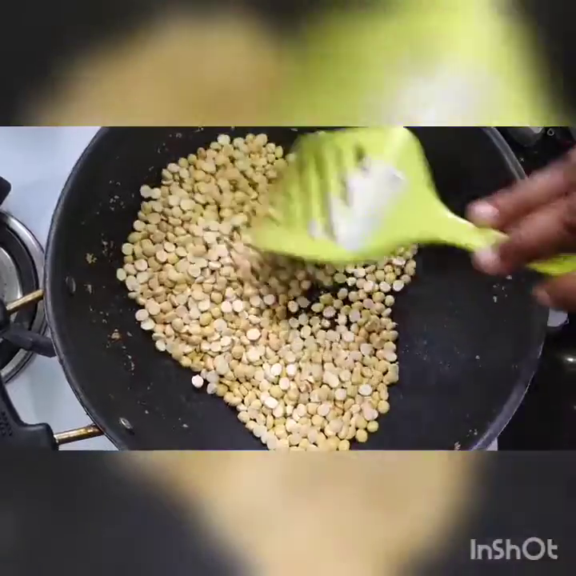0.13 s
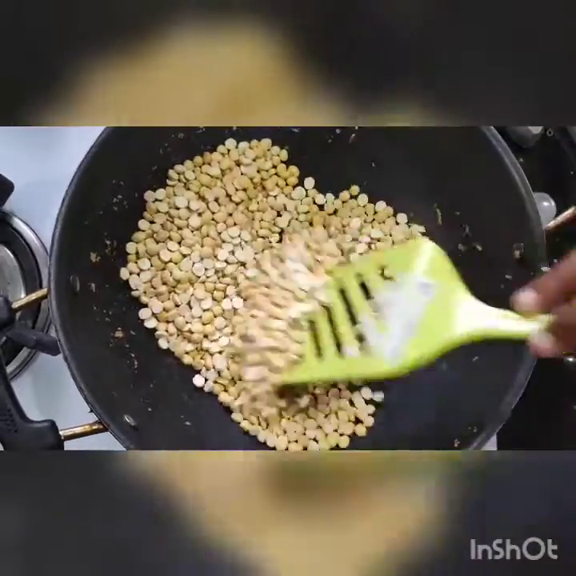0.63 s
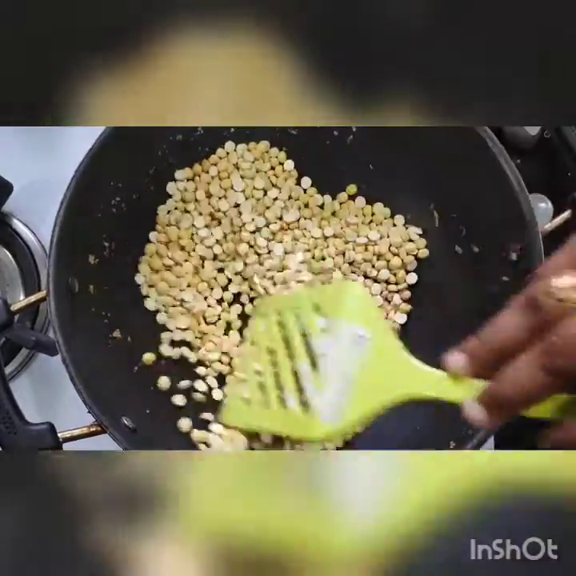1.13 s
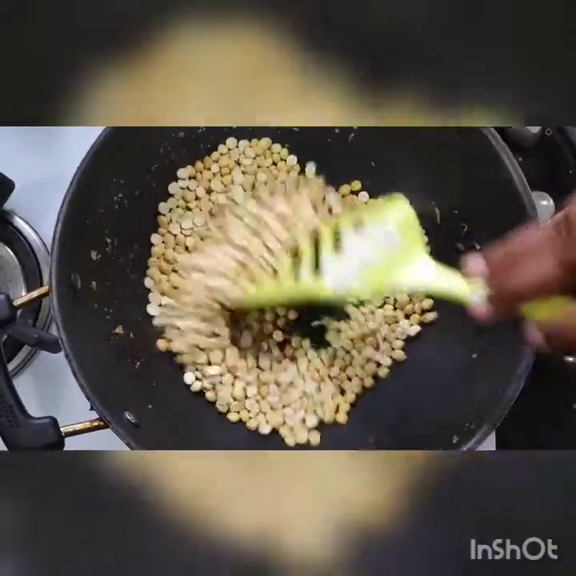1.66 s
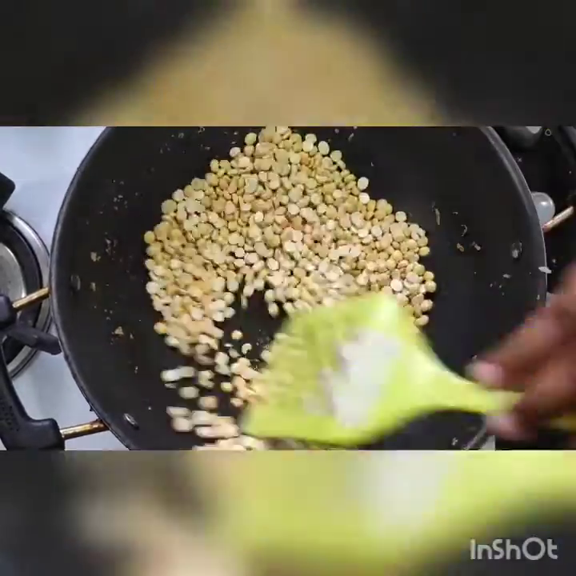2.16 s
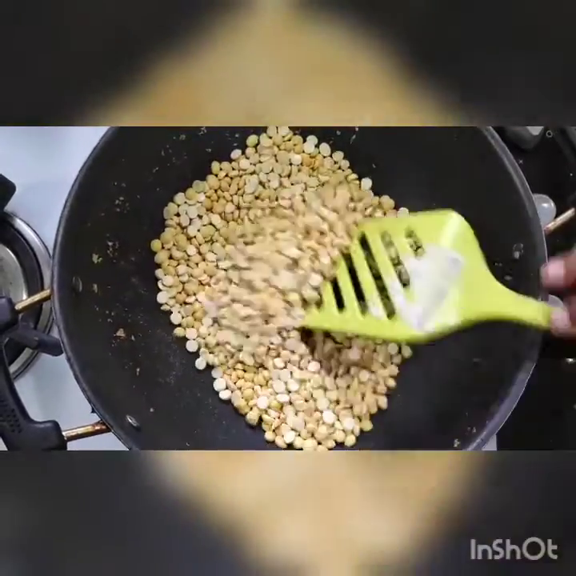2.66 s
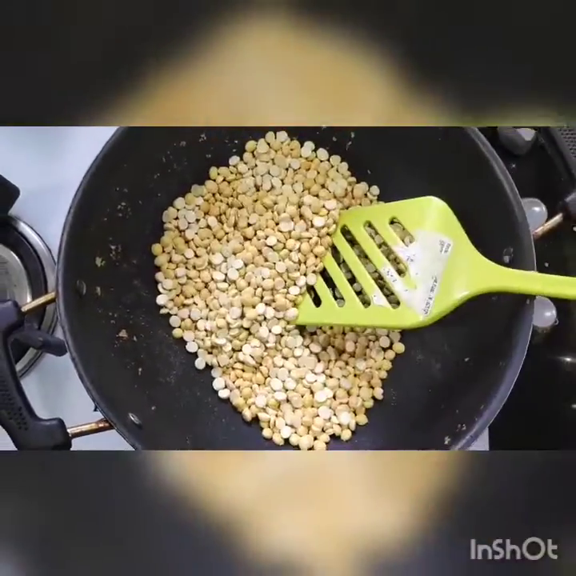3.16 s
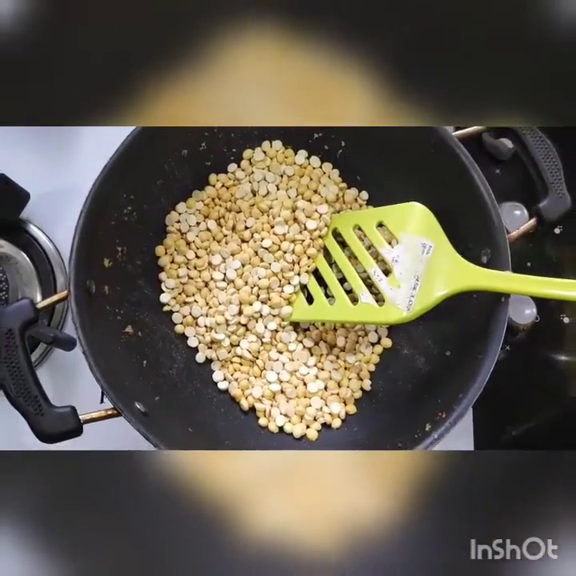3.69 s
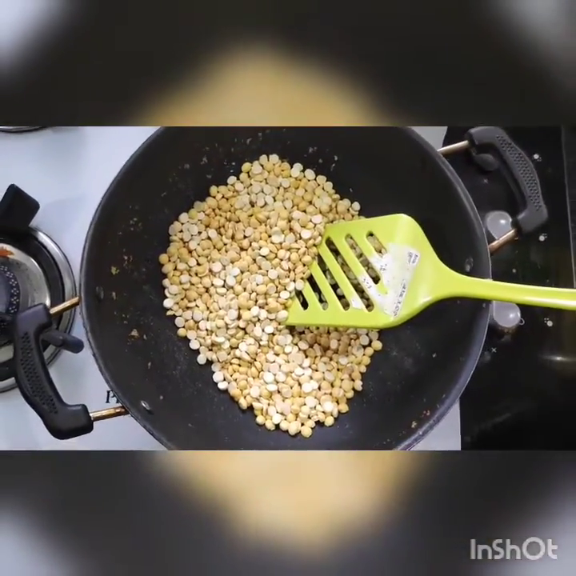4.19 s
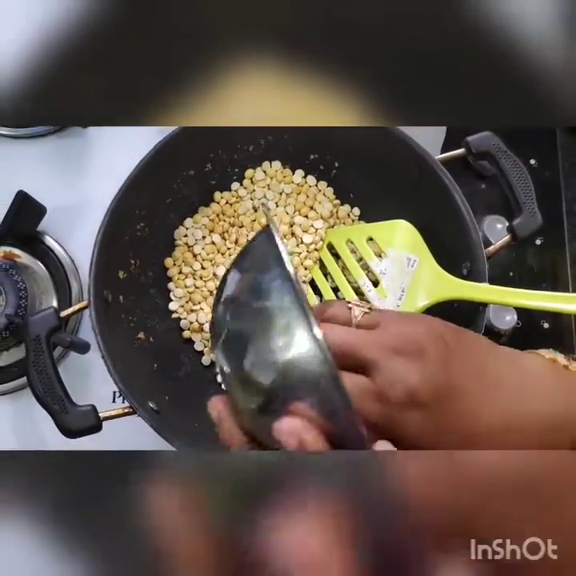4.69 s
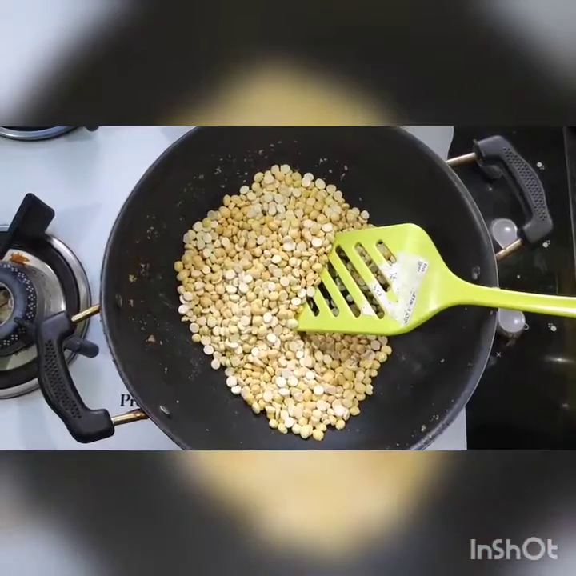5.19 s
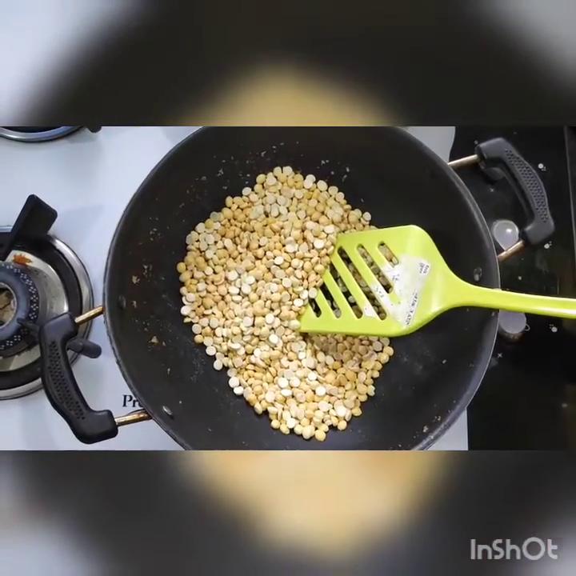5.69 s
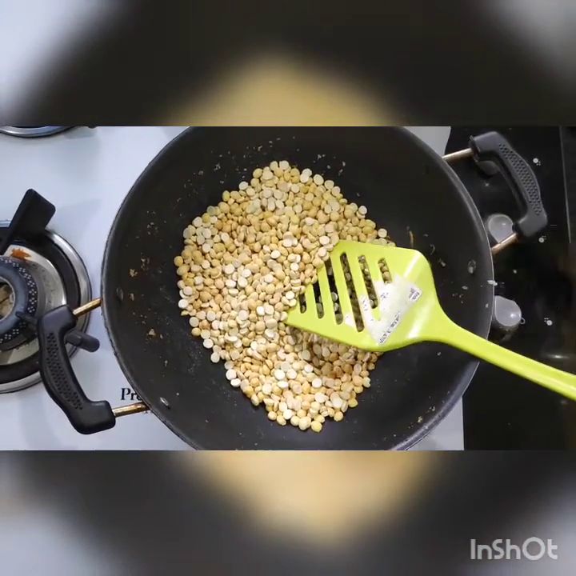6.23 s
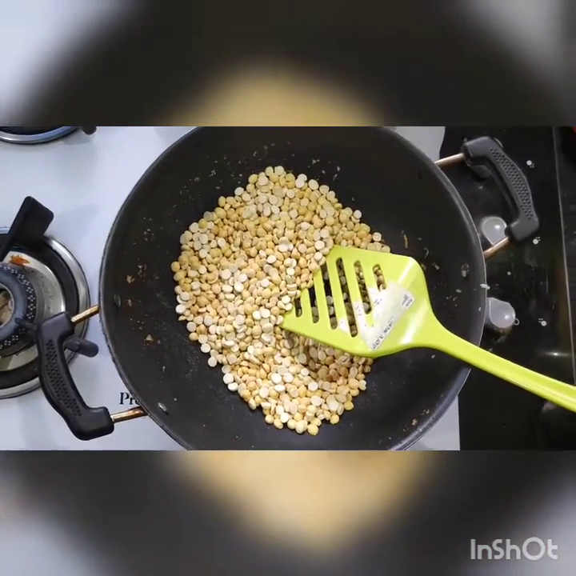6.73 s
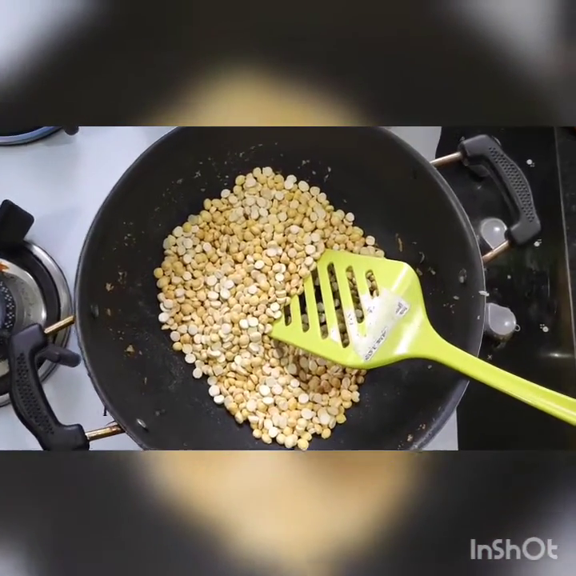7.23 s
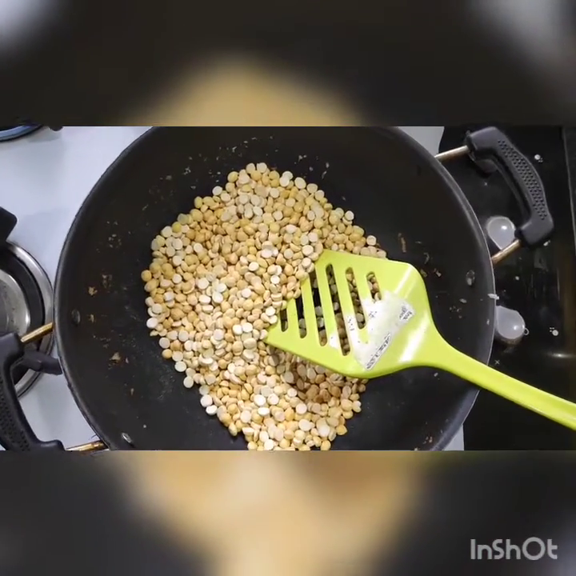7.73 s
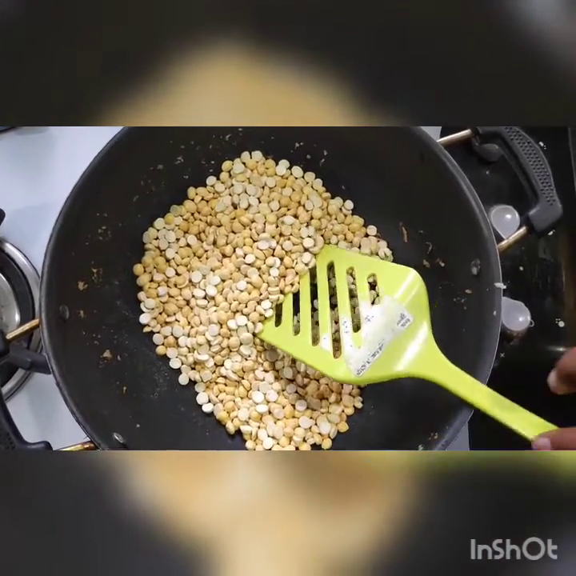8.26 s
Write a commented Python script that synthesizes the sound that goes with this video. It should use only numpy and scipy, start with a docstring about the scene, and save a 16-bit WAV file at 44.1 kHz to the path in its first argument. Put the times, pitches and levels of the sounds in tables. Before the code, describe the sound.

Bright rattling strokes through dry peas in a pan end with a hard knock; soft rustling follows, then steelware clanks and scrapes over a low fan drone.

```python
"""Stirring dry peas in a kitchen

A plastic spatula stirs dry split peas in a metal pan: clumped random contacts drive treble ticks and pan modes.
Hands and cloth then rustle on metal, and steelware knocks and drags on the counter as a struck steel bowl rings.
The pan jolts on its grate and metal squeaks; a fan motor drones as wavering noisy orders under the room tone.
Two microphone ports hear it, the right one through a bright cavity resonance; a noise tail is the small room.
"""
import sys
import numpy as np
from scipy import signal
from scipy.fft import rfft, irfft, next_fast_len
from scipy.io import wavfile

SR = 44100
rng = np.random.default_rng(int(sys.argv[2]) if len(sys.argv) > 2 else 0)


def invert_db(x):
    """Field ratio 10**(x/20) for x, a level in decibels (scalar or array-like)."""
    u = np.asarray(x, float) / 20
    return 10 ** u


def transcribe(u):
    """Save the signal u as a 16-bit wav file named by the first command-line argument.

    u: samples, shape (n,) or (channels, n), limited to [-1, 1]; the rate is SR.
    q: integer samples, one column per channel.
    """
    v = np.clip(np.atleast_2d(u).T, -1, 1)
    q = np.round(v * 32767).astype(np.int16)
    wavfile.write(sys.argv[1], SR, q)


N = 369116


def rms_one(x):
    """Scale so that the mean of the channels has rms 1."""
    return x / np.sqrt(np.mean(np.mean(np.atleast_2d(x), axis=0) ** 2) + 1e-20)


def cut(x, hz, kind):
    """Butterworth filter of order 2."""
    return signal.sosfilt(signal.butter(2, hz, kind, fs=SR, output="sos"), x)


def colour(x, spectrum):
    """Smooth spectral shaping, interpolated over log frequency."""
    size = next_fast_len(N + 4096)
    hz = np.maximum(np.arange(size // 2 + 1) * SR / size, 1)
    table = np.array(spectrum)
    gain_db = np.interp(np.log(hz), np.log(table[:, 0]), table[:, 1])
    return irfft(rfft(x, size) * invert_db(gain_db), size)[..., :N]


def resonance(x, hz, width_hz):
    """Two-pole band-pass, gain 1 on top."""
    r = np.exp(-np.pi * width_hz / SR)
    poles = [1, -2 * r * np.cos(2 * np.pi * hz / SR), r * r]
    return signal.lfilter([(1 - r * r) / 2, 0, (r * r - 1) / 2], poles, x)


def drift(rate_hz):
    """Slow random curve of rms 1: noise at every 40th sample through two equal poles at rate_hz."""
    r = np.exp(-80 * np.pi * rate_hz / SR)
    slow = signal.lfilter([1], [1, -2 * r, r * r], rng.standard_normal(N // 40 + 2002))[2000:]
    return np.interp(np.arange(N) / 40, np.arange(len(slow)), rms_one(slow))


# resonances of the left and the right microphone port, the right with its cavity; f/Hz, width/Hz, boost/dB
LEFT_PORT = [(3354, 420, 4), (2020, 3000, 4), (4010, 57, 1.5)]
RIGHT_PORT = [(7290, 1800, 11), (5020, 530, 5), (6290, 81, 11.5), (7370, 720, 5.5), (13100, 9700, -7),
              (4560, 210, 5.5)]


def ports(pair):
    """Each microphone port adds its own broad and narrow resonances."""
    out = []
    for x, peaks in zip(pair, (LEFT_PORT, RIGHT_PORT)):
        for hz, width_hz, boost_db in peaks:
            x = x + (invert_db(boost_db) - 1) * resonance(x, hz, width_hz)
        out.append(x)
    return np.array(out)


# how far the left port lags for each of six contact spots; lag/samples
LAGS = [-7, -2, 3, 6, 9, 13]


def grains(per_s, spread_db, clump_db, side):
    """Random contacts in clumps, at spots that reach the ports with different lags; side flips the lead."""
    sizes = invert_db(spread_db * np.minimum(rng.exponential(1, N), 4)) * rng.choice([-1, 1], N)
    clicks = sizes * (rng.random(N) < per_s * invert_db(clump_db * drift(25.0)) / SR) + 1e-18
    spot = rng.integers(0, len(LAGS), N)
    left = sum(np.roll(clicks * (spot == k), side * lag) for k, lag in enumerate(LAGS))
    return ports([left, clicks])


def bursts(events, db, decay_s, rise_s=2e-5):
    """Envelope that rises quickly at each blow and dies away exponentially."""
    clicks = np.full(N, 1e-18)
    clicks[(np.array(events)[:, 0] * SR).astype(int)] = invert_db(db)
    dying = signal.lfilter([1], [1, -np.exp(-1 / (decay_s * SR))], clicks)
    rise = np.exp(-1 / (rise_s * SR))
    return signal.lfilter([1 - rise], [1, -rise], dying)


def moves(rows, lingers=1, follows=0):
    """Level in dB of separate moves, each a straight rise and fall; follows adds a share of the last column."""
    t = np.arange(N) / SR
    swell_db = 20  # risen within the swell time, lost again within the fade time
    levels = []
    for s, swell, fade, db, re_db in rows:
        distance = np.where(t < s, (s - t) / swell, (t - s) / (fade * lingers))
        levels.append(db + follows * re_db - swell_db * distance)
    return np.max(levels, axis=0)


def body(x, modes, wander_db):
    """Modes in parallel; their strengths wander, quickly and slowly, as the contact moves."""
    out = 0
    for k, (hz, width_hz, db) in enumerate(modes):
        strength = invert_db(db + wander_db * drift(54.0) + 3.5 * drift(8))
        out = out + (-1) ** k * strength * resonance(x, hz, width_hz)
    return rms_one(out)


# fan motor orders, the lowest one levelled by DRONE_SWELL instead; f/Hz, width/Hz of each of two passes, level/dB
DRONE = [(43, 12, -46), (93.6, 6.9, -51), (128.8, 24.6, -52.5), (165.9, 19.6, -52.5), (244.6, 63, -59)]
# swell of the lowest motor order, before a trim; t/s, level/dB
DRONE_SWELL = [(0.0, -46.5), (1.35, -54), (1.84, -42), (2.07, -50), (2.45, -41), (2.89, -48.5), (3.12, -40),
               (4.41, -38.5), (7.69, -56), (7.85, -47), (8.37, -52)]
# spectrum of the room tone; f/Hz, relative level/dB
AIR = [(35, -30), (60, 0.5), (170, -13), (250, -14), (450, -12), (900, -14.5), (1700, -16), (3500, -27.5),
       (6500, -36.5), (9000, -34), (13800, -34.5), (14800, -78)]


def background():
    """Narrow noisy motor orders, the lowest with a steadier core, over a diffuse room tone."""
    mid, side = rng.standard_normal((2, N))
    bass = cut(mid + .25 * side * [[1], [-1]], 900, "low")  # nearly alike on both sides
    treble = cut(np.array([mid, side]), 900, "high")  # independent sides
    air = ports(colour(bass + treble, AIR)) * invert_db([[-1.0], [1.0]])
    air_db = -55  # level above 300 Hz
    air *= invert_db(air_db + .6 * drift(3)) / np.std(cut(air.mean(axis=0), 300, "high"))
    orders = []
    for hz, width_hz, db in DRONE:
        noise = rng.standard_normal(N)
        narrow = resonance(resonance(noise, hz, width_hz), hz, width_hz)
        orders.append(rms_one(narrow) * invert_db(db))
    core_hz = DRONE[0][0] * (1 + 0.0473 * drift(3.14))
    core = np.sqrt(2) * np.sin(2 * np.pi * np.cumsum(core_hz) / SR)
    swell_s, swell_db = np.transpose(DRONE_SWELL)
    swell = invert_db(np.interp(np.arange(N) / SR, swell_s, swell_db) - 2)
    orders[0] = (core + .8 * rms_one(orders[0])) * swell
    return air + sum(orders)


def ticks(clicks, cycles):
    """Peas of many pitches: moments of contact are dealt to short resonances spread over the treble."""
    pitches = np.geomspace(4500, 13500, num=14)
    dealt = np.repeat(rng.integers(0, len(pitches), N // 32 + 1), 32)[:N]
    return sum(resonance(clicks * (dealt == k), hz, hz / cycles) for k, hz in enumerate(pitches))


# pea against pea and metal, also the brightness of other contacts; f/Hz, relative level/dB
RATTLE = [(2500, -16), (4300, 1.5), (5100, 5.5), (7000, 2.5), (10000, 4), (13000, 3.5), (14200, -2),
          (15000, -64), (16600, -44.5)]
# pan wall under the peas, short bright rings; f/Hz, width/Hz, level/dB
PAN_WALL = [(4720, 27, 3), (5224, 58, 7.5), (5710, 30, 7), (6180, 63, 3), (6150, 76, 6), (6660, 72, 4.5),
            (6990, 49, 5.5), (7380, 33, 2.5), (8040, 93, 2), (8500, 17, 14), (8970, 9.7, 11.5),
            (9720, 52, 6), (12100, 23, -4.5)]


def pea_rattle(hands):
    """Peas tick in the treble and ring the pan wall, less so while the hands move."""
    peas = grains(3000., spread_db=4, clump_db=4.5, side=1)
    peas = colour(rms_one(ticks(peas, cycles=34)) + .45 * rms_one(peas), RATTLE)
    wall = np.where(hands, invert_db(-7), invert_db(-1)) * body(peas, PAN_WALL, wander_db=4.5)
    return rms_one(rms_one(peas) + wall)


# pan damped by the peas; f/Hz, width/Hz, level/dB
PAN = [(265, 18, 9.5), (635, 140, 8), (1183, 100, 7.5), (2055, 63, 2), (2490, 150, -3), (3240, 79, 4.5),
       (3776, 170, -4.5), (4730, 430, -5.5)]
# hands and cloth on metal; f/Hz, width/Hz, level/dB
RUSTLE = [(380, 160, 11), (1000, 246, 11), (1400, 130, -0.5), (2260, 140, -3), (3700, 1500, -8.5),
          (4400, 230, -4)]


def scrape_and_push(after_stirring, strokes):
    """Rubbing contacts sound through the pan, later through the metal under the hands: bright scrape, dull push."""
    rubbing = grains(2500., spread_db=4, clump_db=3.5, side=1)
    by_hands = body(rubbing, RUSTLE, wander_db=2)
    by_spatula = body(rubbing, PAN, wander_db=2.5)
    rubbed = np.where(after_stirring, by_hands, by_spatula)
    scrape = rms_one(cut(rubbed, 1600., "high"))
    push = rms_one(cut(rubbed, 1400., "low"))
    scrape_db = moves(strokes, lingers=1.53, follows=True)
    # push follows the scrape column in part, and is 9 dB lighter from the hands onward
    push_db = moves(strokes, lingers=1, follows=0.57) - 4 - 9 * after_stirring
    return scrape * invert_db(scrape_db) + push * invert_db(push_db)


# spatula blows on the pan, before trims; t/s, crack level/dB, pan ring level/dB re crack, thud level/dB re crack
BLOWS = [(0.117, -25.5, 4, -19), (0.1295, -27, 3, 3), (0.2183, -33, 2, -22), (0.499, -26, -10, -25),
         (0.5047, -24, 3, -7.5), (0.6624, -23.5, 6.5, -20), (0.7075, -25, 5, -33), (1.0755, -23, -2, -23),
         (1.1353, -20, 1.5, 1), (1.157, -29, -8, -24), (1.4922, -19, -5, -36), (1.5925, -18, -3, 0.5),
         (2.0795, -21.5, 0, -14), (2.1316, -16, 3, -32), (2.166, -32, 6, 17), (2.1798, -26.5, 8, -4),
         (2.503, -18.5, -3, -27), (2.6158, -18.5, 1.5, -8), (2.682, -42, -11, -7), (2.7706, -13, 1, -44),
         (2.8807, -8.5, 5, -7.5), (4.2686, -37.5, 17, -37), (4.8462, -26.5, 1, -34),
         (4.8747, -20, 3.5, -19.5), (4.9633, -27.5, 1, -12), (6.095, -7.5, 4, -8.5),
         (6.1865, -16, 1.5, -8.5), (6.2074, -33, -22, 9.5)]
# peas and small things snapping against metal, before trims; t/s, crack level/dB
SNAPS = [(0.187, -30), (0.2487, -29), (0.275, -29), (0.573, -33), (2.231, -27), (0.342, -23.5),
         (0.395, -28), (0.404, -31), (0.695, -21.5), (0.735, -24), (1.533, -24), (1.642, -16), (1.68, -24),
         (1.963, -26), (0.839, -28.5), (1.034, -27), (1.422, -29.5), (0.757, -16.5), (0.7734, -16),
         (0.799, -18), (1.216, -21.5), (1.3652, -24.5), (1.7706, -16.5), (1.7938, -14), (1.822, -20),
         (1.854, -14.5), (1.918, -15.5), (2.201, -18.5), (2.268, -32), (2.735, -22.5), (2.82, -33),
         (3.457, -37), (3.683, -34), (3.994, -29), (3.5068, -15.5), (3.5245, -45), (3.591, -38),
         (3.534, -16), (3.714, -31), (3.743, -28), (3.9548, -15.5)]


def knocks(dense):
    """Blows and snaps are brief clusters of dense contacts: a crack that rings the wall, a pan ring and a thud."""
    snap_ring_db, snap_thud_db = -20, -44.5  # re crack, before trims
    events = BLOWS + [(s, db, snap_ring_db, snap_thud_db) for s, db in SNAPS]
    _, crack_db, ring_db, thud_db = np.transpose(events)
    crack = rms_one(colour(dense, RATTLE)) * bursts(events, crack_db - 2, .003, rise_s=.0012)
    wall = 0
    for hz, width_hz, db in PAN_WALL:
        # each blow rings the wall differently
        wall = wall + invert_db(db + 5.7 * drift(25.0)) * resonance(crack, hz, width_hz)
    ring_envelope = bursts(events, crack_db + ring_db - 15.5, 0.0086)
    ring = rms_one(cut(dense, [1700., 4500.], "band")) * ring_envelope
    thud_envelope = bursts(events, crack_db + thud_db - 5, .009, rise_s=.002)
    thud = rms_one(cut(dense, [330., 950.], "band")) * thud_envelope
    return crack + invert_db(-1.0) * wall + ring + thud


# hands and cloth take over from the stirring; from t/s, to t/s
HANDS_S = (3.3, 5.7)
# spatula strokes through the peas; the two after 6 s are knocks of the spatula as it lies;
# peak t/s, swell/s, fade/s, rattle level/dB, scrape level/dB re rattle
STROKES = [(0.004, 0.027, 0.067, -45, -18), (0.107, 0.003, 0.088, -31, -11.5), (0.228, 0.09, 0.11, -30, -4),
           (0.51, 0.0074, 0.012, -23, -22), (0.782, 0.64, 0.083, -36, -9.5), (0.986, .003, 0.52, -45, -0.5),
           (1.144, 0.14, 0.13, -28.5, -8.5), (1.365, 0.041, 0.057, -31, -19),
           (1.493, 0.0035, 0.44, -32.5, -10), (1.648, 0.11, 0.06, -26, 1.5),
           (1.792, 0.092, 0.14, -28.5, -22), (2.16, 0.27, 0.085, -28.5, -17), (2.174, 0.03, 0.05, -39, 9),
           (2.238, 0.38, 0.14, -36.5, -30), (2.502, 0.008, 0.55, -33, -12), (2.7, 0.21, 0.13, -36.5, 4),
           (2.882, 0.0045, 0.1, -29.5, -26), (6.095, 0.0056, 0.12, -25.5, -8.5),
           (6.188, 0.0027, 0.073, -33, -3.5)]
# hands and cloth moving; peak t/s, swell/s, fade/s, rustle level/dB, rubbing level/dB re rustle
RUSTLES = [(3.369, .24, 0.025, -61, -18), (3.38, .004, 0.28, -40.5, -2.5), (3.454, 0.061, 0.086, -29, -6),
           (3.534, 0.14, 0.15, -31, -10.5), (3.91, 0.37, 0.03, -35.5, -5), (3.959, 0.0039, 0.16, -45, -14),
           (4.268, 0.013, 0.02, -29.5, -11), (4.326, 0.15, 0.096, -40, -2.5),
           (4.518, 0.099, 0.021, -37, -5.5), (4.76, 0.69, 0.49, -49, -2.5), (4.885, 0.13, 0.21, -42.5, -6)]


def stirring():
    """Spatula, then hands: bright rattle or smoother rustle, rubbing through metal, and dense clustered blows."""
    t = np.arange(N) / SR
    after_stirring = t > HANDS_S[0]
    hands = after_stirring & (t < HANDS_S[1])
    strokes = STROKES + RUSTLES
    rattle = pea_rattle(hands)
    rubbing = scrape_and_push(after_stirring, strokes)
    dense = grains(30000., spread_db=1, clump_db=0, side=1)
    cloth = .8 * rattle + .6 * rms_one(colour(dense, RATTLE))  # cloth is smoother
    rattle_or_rustle = np.where(hands, cloth, rattle) * invert_db(moves(strokes))
    return rattle_or_rustle + rubbing + knocks(dense)


def kitchen(pair):
    """A dying noise tail, alike on both sides in the bass, duller as it dies."""
    t60_s, alike_below_hz, room_db = 0.45, 1100, -6.5
    t = np.arange(int(.7 * SR)) / SR
    mid, side = rng.standard_normal((2, len(t)))
    tail = mid + cut(side, alike_below_hz, "high") * [[1], [-1]]
    low = cut(tail, 3930.0, "low")
    tail = low * invert_db(-60 * t / t60_s) + (tail - low) * invert_db(-60 * t / (0.37 * t60_s))
    tail *= np.clip((t - .003) / 0.004, 0, 1)  # the first reflections take a few ms
    tail /= np.sqrt(np.sum(tail ** 2) / 2)
    return invert_db(room_db) * signal.fftconvolve(pair, tail, axes=1)[:, :N]


# pan jolting on the grate; t/s, level/dB
THUMPS = [(0.133, -21), (0.51, -35.5), (1.132, -28.5), (1.299, -33.5), (1.535, -29.5), (1.63, -33.5),
          (1.995, -26), (2.177, -30), (2.304, -37.5), (2.587, -26.5), (2.883, -31.5), (6.096, -33)]
# low modes of pan and grate; f/Hz, level/dB, t60/s
GRATE = [(134.2, 3, 0.17), (167.7, -8.5, 0.29), (241, -3, 0.31), (355.5, -11, 0.55)]


def thumps():
    """The pan jolts on its grate: a few low modes, struck with new strengths each time."""
    out = 0
    thump_db = np.array(THUMPS)[:, 1]
    for hz, db, t60 in GRATE:
        jolt = bursts(THUMPS, thump_db + db + rng.normal(0, 1.5, len(THUMPS)), 0.00068)
        width_hz = np.log(1000) / (np.pi * t60)
        # dividing by the width keeps narrow modes as loud as wide ones
        out = out + resonance(jolt, hz, width_hz) / (np.pi * width_hz * .002)
    return out


# brief pitched squeaks and rings of metal; t/s, length/s, f/Hz, level/dB
SQUEAKS = [(0.263, 0.054, 2451, -41), (0.665, .08, 1131, -48), (0.875, 0.095, 2452, -44),
           (0.92, .1, 4901, -52), (1.51, 0.08, 2453, -44), (1.631, .071, 1132, -32),
           (4.503, 0.02, 931, -46), (4.505, 0.06, 1501, -47), (4.51, .055, 2340, -46),
           (4.732, .048, 2340, -47), (3.44, .035, 7000, -37), (3.521, .01, 3700, -38),
           (3.536, .025, 7200, -31), (3.586, .012, 3500, -46), (4.31, .03, 3250, -50),
           (4.315, .03, 1900, -51), (4.515, .03, 3720, -50), (6.546, .01, 4450, -46),
           (6.546, .01, 2950, -47), (7.215, .025, 900, -30), (7.255, .02, 900, -31),
           (8.085, .03, 3690, -41), (7.962, .035, 820, -28), (6.575, .015, 6400, -39),
           (6.59, .05, 4430, -42), (6.637, .07, 2970, -38), (7.23, 0.03, 2321, -25),
           (7.225, 0.05, 3111, -28), (7.647, 0.022, 2751, -22), (7.811, 0.035, 3670, -29),
           (7.849, .035, 3681, -23), (7.889, .022, 3681, -22), (7.913, .012, 3700, -27),
           (7.868, .03, 2320, -27), (7.905, .02, 2250, -29), (7.96, .03, 2350, -29),
           (7.846, 0.031, 6091, -29), (7.873, 0.057, 5741, -33), (8.129, 0.02, 2100, -42)]


def squeaks():
    """Short sine tones with a quick swell and a late fade, slightly unsteady in pitch and rough in level."""
    t, out = np.arange(N) / SR, np.zeros(N)
    unsteady = 2 * np.pi * np.cumsum(0.00585 * drift(80.0)) / SR
    rough = invert_db(3.5 * drift(90.0))
    for s, length, hz, db in SQUEAKS:
        at = slice(int(s * SR), int((s + length) * SR))
        x = (t[at] - s) / length
        envelope = np.minimum(x * 5, 1) * (1 - x) ** 0.087
        tone = np.sin(hz * (2 * np.pi * t[at] + unsteady[at]))
        out[at] += invert_db(db) * rough[at] * envelope * tone
    return np.array([np.roll(out, LAGS[1]), out])


# steelware dragged and rocking, before trims; peak t/s, swell/s, fade/s, grit level/dB, ringing level/dB re grit
DRAGS = [(6.545, 0.0068, 0.16, -46.5, -2), (6.636, 0.075, 0.12, -43, -3), (7.006, .003, .25, -33, -5),
         (7.15, .02, .15, -40, -6), (7.188, 0.0034, 0.1, -34, 4), (7.237, 0.09, 0.18, -32, 7),
         (7.653, 0.0085, 0.17, -27, 6), (7.803, 0.0036, 0.234, -39, 14.5), (7.876, 0.08, 0.15, -27.5, 4.5),
         (7.99, 0.32, 0.12, -33, -0.5)]
# steelware set down, before trims; t/s, crack level/dB, ring level/dB re crack, thud level/dB re crack
CLANKS = [(6.5788, -25, -4, -35), (6.646, -29, 0, -10), (7.0067, -9, -3, -7), (7.1475, -34, -8, -6),
          (7.187, -13, 0, -9), (7.2255, -11, 3, -10), (7.65, -17, -3, 11), (7.657, -24, -3, 15),
          (7.6887, -23, -3, -2), (7.803, -17, 0, 7), (7.824, -27, 3, 14), (7.8496, -18, -2, 2),
          (7.878, -27, 3, 6), (7.8928, -19, 2, -4), (7.917, -25, 2, 0), (7.946, -29, 2, 10),
          (7.9561, -28, 6, 2), (7.9878, -25, -2, 8), (8.118, -40, 0, 8)]
# steel dish held in the hand; f/Hz, width/Hz, level/dB
DISH = [(614, 87, -16.5), (730, 39, -19), (785, 21, -15), (823, 17, -20), (1950, 44, -19.5),
        (2330, 240, -11.5), (2742, 40, -19), (2900, 44, -15), (3175, 32, -24.5), (3673, 64, -19),
        (4080, 44, -25), (4400, 35, -26), (5120, 35, -22), (5300, 21, -37), (5730, 13, -20)]


def steelware():
    """Grit and blows drive the dish's modes, each with a strength that wanders as the grip shifts."""
    grit_db = moves(DRAGS)
    ringing_db = moves(DRAGS, lingers=0.85, follows=True)
    rumble_db = moves(DRAGS, lingers=1.17, follows=0.26) - 0.5
    _, crack_db, ring_db, thud_db = np.transpose(CLANKS)
    contact = grains(8000., spread_db=1.0, clump_db=3.5, side=-1)
    grit = invert_db(grit_db) + bursts(CLANKS, crack_db - 8, .005)
    high = invert_db(ringing_db) + bursts(CLANKS, crack_db + ring_db - 9, .005)
    low = invert_db(rumble_db) + bursts(CLANKS, crack_db + thud_db - 5.0, 0.0052)
    out = rms_one(colour(contact, RATTLE)) * grit
    out += invert_db(-13) * rms_one(cut(contact, [1500, 4500], "band")) * high
    out += invert_db(-9) * rms_one(cut(contact, [600, 1080], "band")) * low
    out += invert_db(-13) * rms_one(cut(contact, [350, 620], "band")) * low  # the counter booms
    contact = rms_one(contact)
    for hz, width_hz, db in DISH:
        follows = low if hz < 1600 else high  # low modes follow the thud
        drive = contact * follows * invert_db(5 * drift(20))
        out += invert_db(db) * np.sqrt(SR / width_hz / np.pi) * resonance(drive, hz, width_hz)
    return out


# the blow on the bowl and its choking; struck t/s, level/dB, choked t/s, t60/s of a full choke
BOWL_BLOW = (7.005, -20, 7.1, .3)
# steel bowl; f/Hz, level/dB, t60/s, share of the choke (0-1, less again above 1500 Hz)
BOWL = [(711, -1, 5, 1), (899, -11, .8, .3), (940, -14, .25, .3), (1184, -24, 1.2, .3),
        (1370, -30, 1.2, .15), (1497, -22, 1.2, .3), (1863, -22, 1.5, 1), (2159, -10, .7, 1),
        (2185, -13, .5, 1), (2519, -22, 2, 1), (2815, -17, 1, 1), (2972, -20, 1, 1), (3297, -1, .35, .3),
        (3400, -8, .3, 1), (3660, -7, .3, 1), (3758, -14, .7, 1), (4522, -6, .45, .6), (4694, -9, .36, 1),
        (5190, -7, .3, 1), (5491, -14, .25, 1), (6019, -9, .3, 1), (6455, -4, .35, 1), (6702, -8, .12, 1),
        (6826, -11, .12, 1), (7251, -17, .5, 1), (7467, -14, .3, 1), (7865, -19, .5, 1),
        (8193, -14, .44, 1), (8759, -13, .15, 1), (9335, -22, .6, 1), (10360, -10, .2, 1),
        (10590, -15, .31, 1), (11100, -19, .36, 1), (12780, -19, .32, 1), (13280, -10, .12, 1)]


def bowl():
    """A blow rings the bowl's sines; touching the counter then chokes all its modes, the low 711 Hz one most."""
    struck_s, blow_db, choked_s, choke_t60 = BOWL_BLOW
    t = np.maximum(np.arange(N) / SR - struck_s, 0)
    choked = np.maximum(t - (choked_s - struck_s), 0)
    out = np.zeros((2, N))
    for hz, db, t60, choke in BOWL:
        phase = rng.normal(0, min(hz / 2500, 2), (2, 1))  # high modes reach the ports out of step
        uneven_db = min((hz / 1000) ** 2, 2.5) * drift(30)  # the bowl rocks; high modes waver most
        choke_db = 60 * choke * min(1500 / hz, 1) * choked / choke_t60
        level_db = db + uneven_db - 60 * t / t60 - choke_db
        out += invert_db(level_db) * np.sin(2 * np.pi * hz * t + phase)
    return invert_db(blow_db) * out * np.minimum(t / .002, 1)


def scene():
    """Sources, their echo in the kitchen, and the steady background."""
    close = cut(stirring() + thumps() + steelware(), 80, "high")
    rings = squeaks() + bowl()
    # squeaks and bowl are sent to the room 10 dB lower, so their steady tones stay clear
    echo = kitchen(close + invert_db(-10) * rings)
    return close + rings + echo + background()


def top_cut(x):
    """Nothing passes above the cut-off."""
    return signal.sosfilt(signal.butter(12, 16650, fs=SR, output="sos"), x)


def record(dry):
    """Peaks are rounded by a soft limit, then the top is cut by a steep low-pass."""
    rounded = 0.68 * np.tanh(dry / 0.79)
    top = signal.cheby2(10, 60, 16700, fs=SR, output="sos")
    mix = signal.sosfilt(top, rounded)
    return top_cut(mix)


dry = scene()
out = record(dry)
transcribe(out)
```